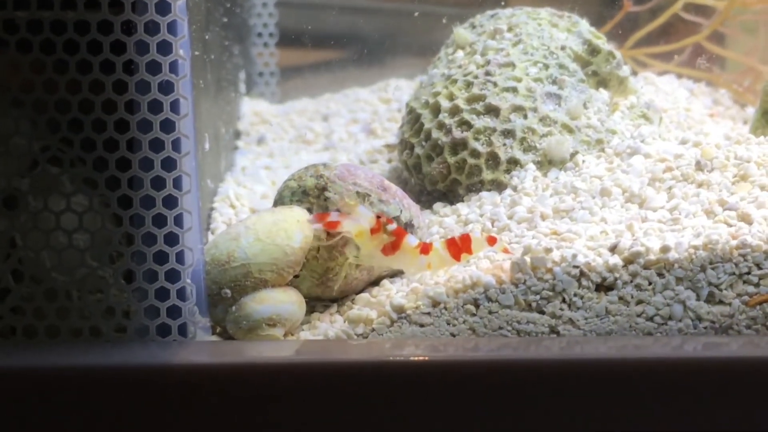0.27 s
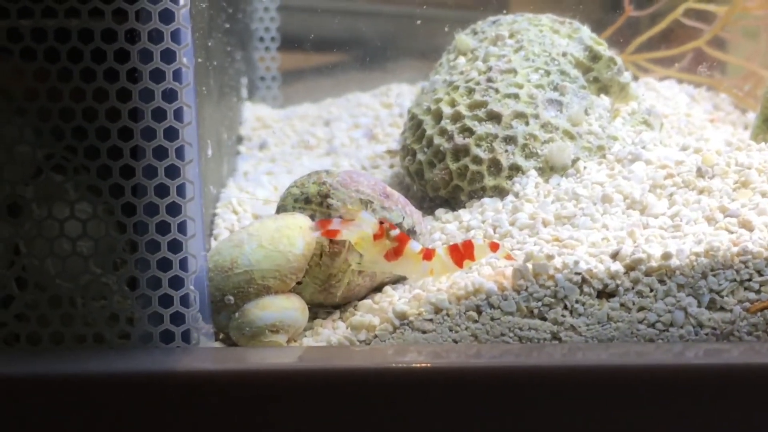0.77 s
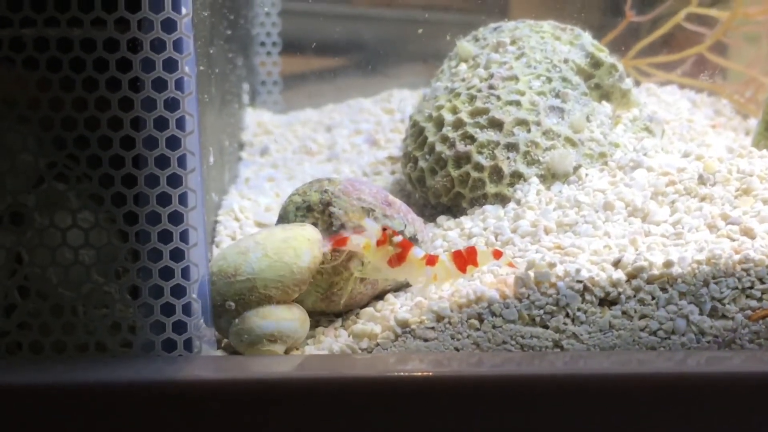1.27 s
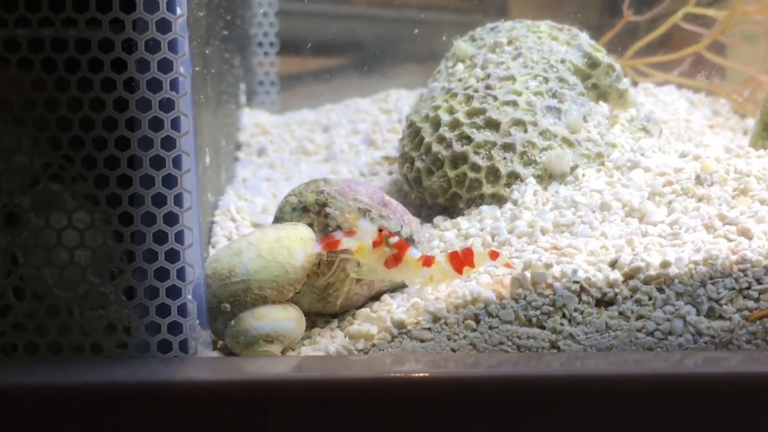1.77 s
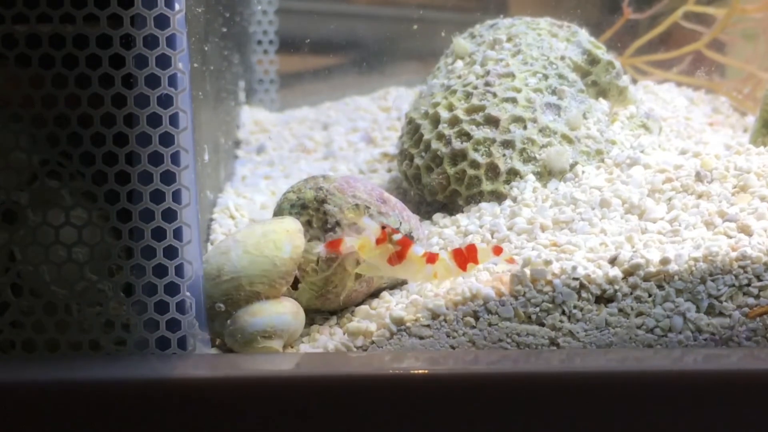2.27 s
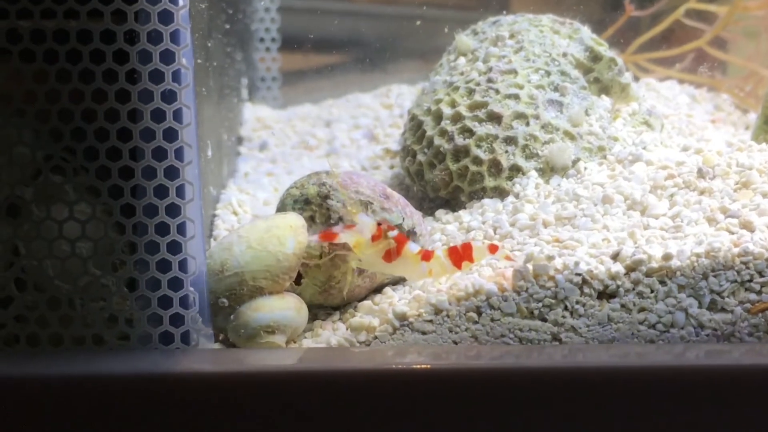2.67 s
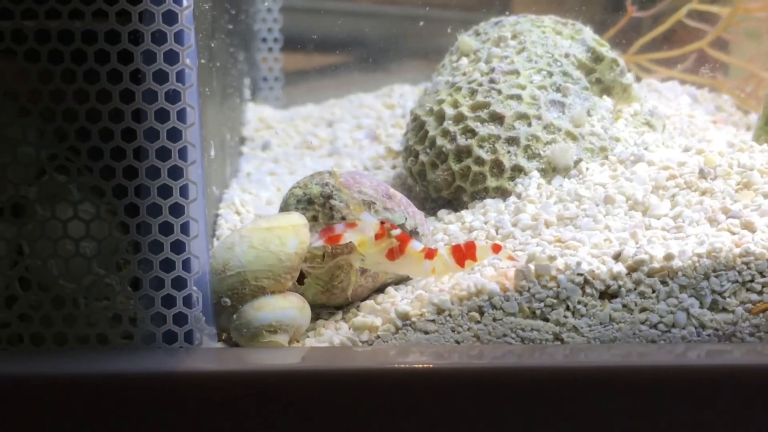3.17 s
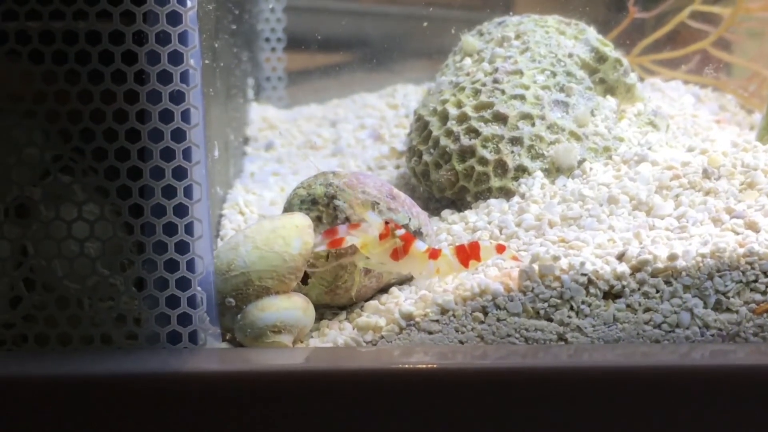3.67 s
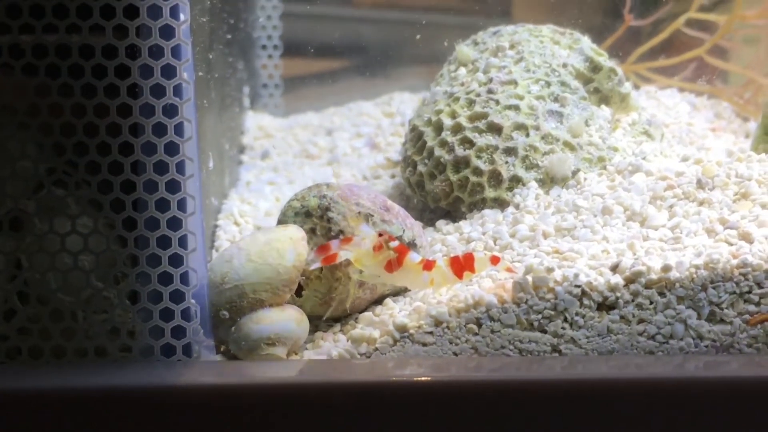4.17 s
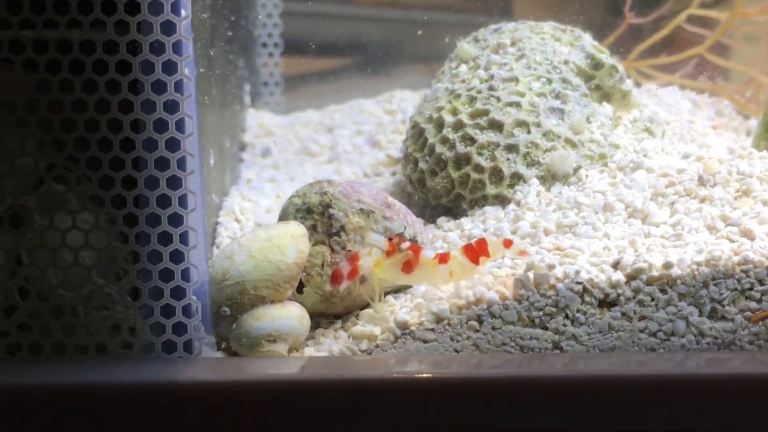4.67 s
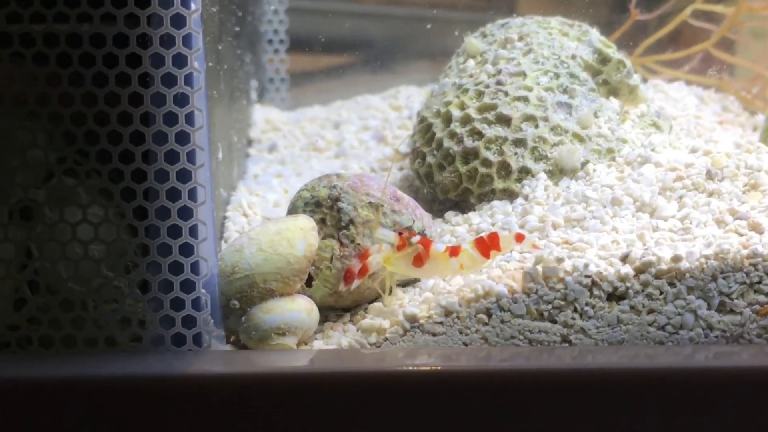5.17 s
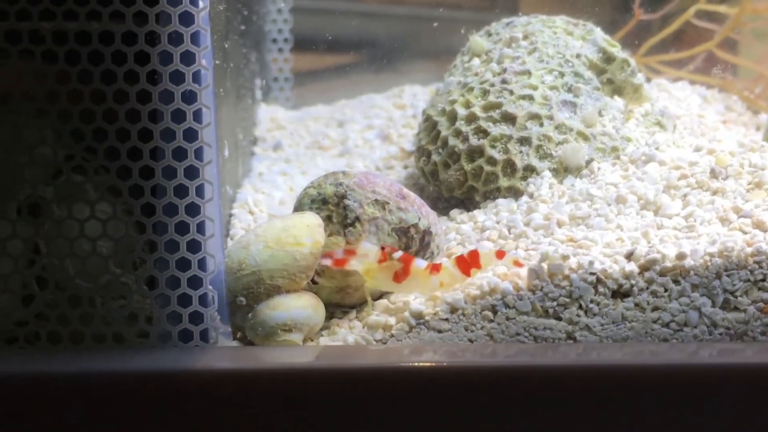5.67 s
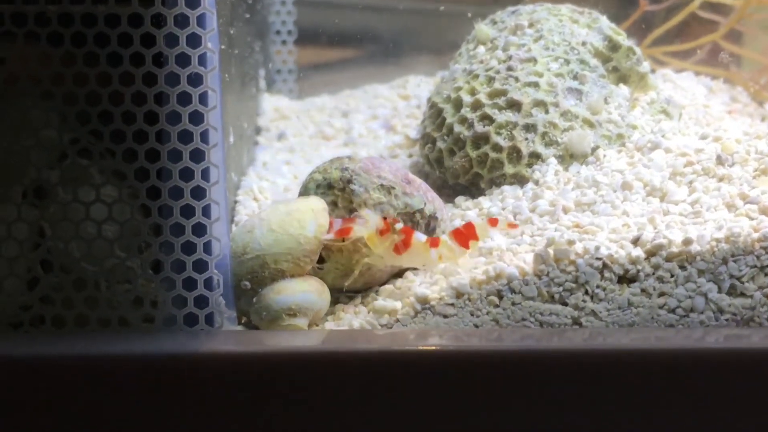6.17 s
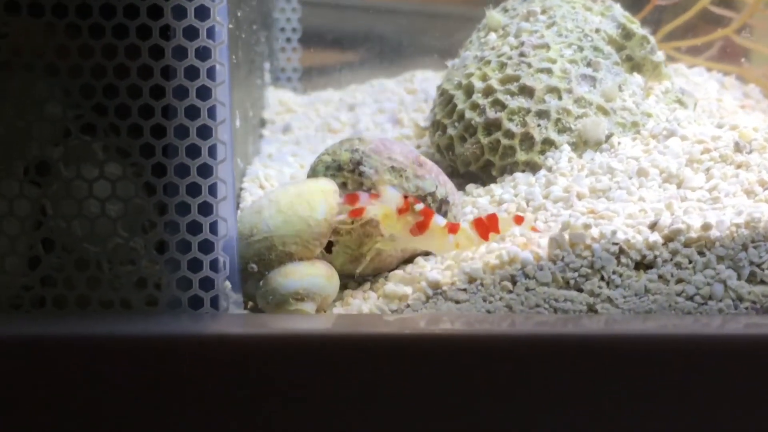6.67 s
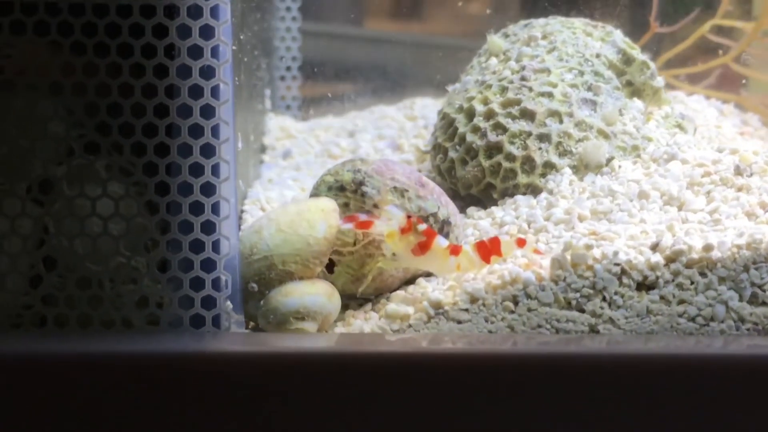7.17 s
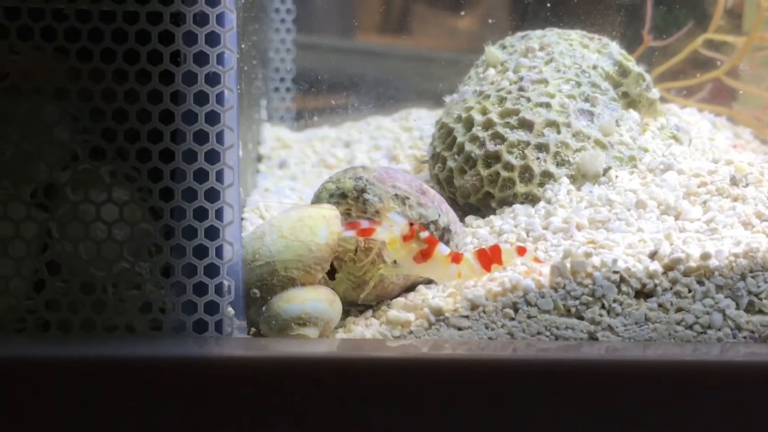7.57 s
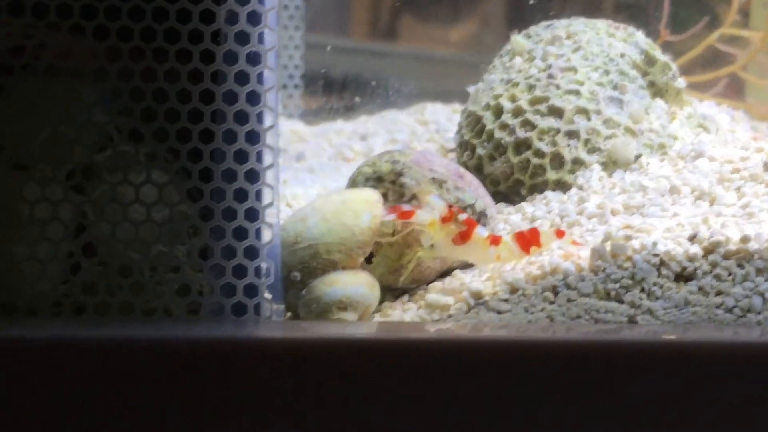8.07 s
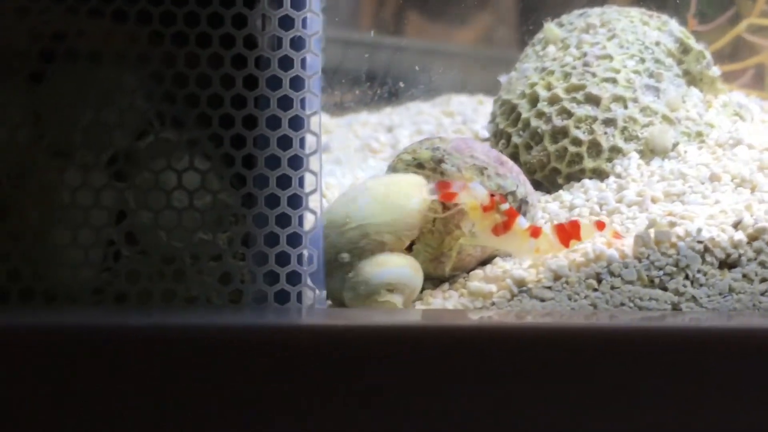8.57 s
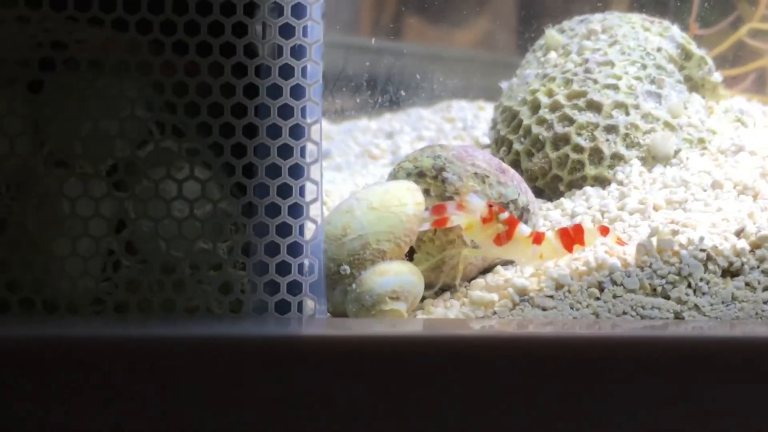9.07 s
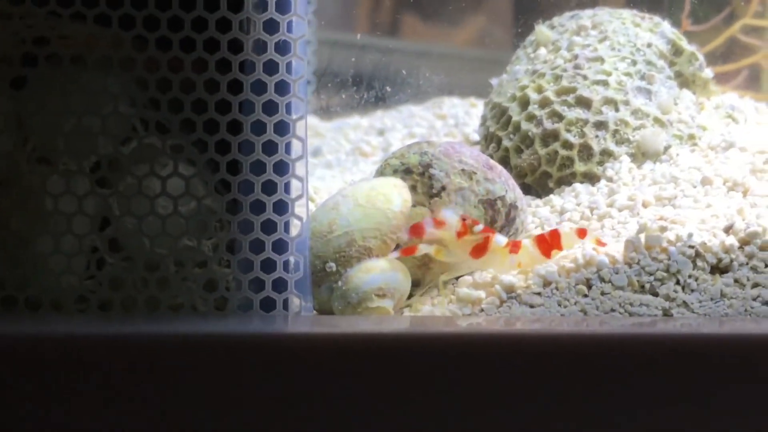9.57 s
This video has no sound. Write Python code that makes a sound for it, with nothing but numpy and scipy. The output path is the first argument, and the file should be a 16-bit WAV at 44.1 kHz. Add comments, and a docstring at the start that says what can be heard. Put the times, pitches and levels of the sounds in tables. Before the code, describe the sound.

Three sharp, irregularly spaced claw snaps from a shrimp in a home aquarium, with pump equipment humming low throughout.

```python
"""A pistol shrimp snaps its claw three times in a home aquarium.
Each snap is a collapsing bubble: one sharp pulse that rattles between the panes, rings the glass
and dies away in the room. Behind it the pump hums, its impeller whirrs, the water washes around
and four faint ticks sound. A noise suppressor holds the hiss down, but lets it through for a
moment after each snap."""
import sys
import numpy as np
from scipy import signal
from scipy.fft import rfft, irfft
from scipy.io import wavfile
from scipy.ndimage import uniform_filter1d, minimum_filter1d

SR = 44100
rng = np.random.default_rng(int(sys.argv[2]) if len(sys.argv) > 2 else 0)


def to_wav(sig):
    """Store sig (one row per channel, or 1-D mono) as 16-bit WAV at the path in sys.argv[1].

    Samples outside -1..1 are clipped; the rate is SR.
    """
    pcm = np.clip(np.atleast_2d(sig), -1, 1) * 32767
    pcm = np.round(pcm).astype(np.int16)
    wavfile.write(sys.argv[1], SR, pcm.T)  # frames by channels


N = 432178  # 9.8 seconds


def amp(db):
    """Turns decibels into a number to multiply by."""
    return 10 ** (np.asarray(db) / 20)


def unit_level(x):
    """Scales a sound so that its average level (rms) is 1."""
    return x / np.sqrt(np.mean(x ** 2) + 1e-20)


def curve(points, hz):
    """Joins the (frequency, value) rows of a table and looks up the value at hz."""
    point_hz, value = np.transpose(points)
    return np.interp(np.log(hz + 1), np.log(point_hz + 1), value)


def add(mix, start_s, sound):
    """Lays a sound into the mix at its start time."""
    part = mix[round(start_s * SR):][:len(sound)]
    part += sound[:len(part)]


def frequencies(x):
    """Lists the frequencies that make up x, in Hz."""
    return np.fft.rfftfreq(len(x), 1 / SR)


def equalize(x, db):
    """Turns each frequency up or down, without delay."""
    return irfft(rfft(x) * amp(db), len(x))


def equalize_hit(x, db):
    """Turns each frequency up or down so that nothing sounds ahead of a hit (minimum phase)."""
    cepstrum = irfft(np.log(amp(db)), len(x))
    cepstrum[1:len(x) // 2] *= 2
    cepstrum[len(x) // 2 + 1:] = 0
    return irfft(rfft(x) * np.exp(rfft(cepstrum)), len(x))


def hump(hz, centre_hz, octaves):
    """A smooth hump of height 1 around one frequency."""
    return np.exp(-.5 * (np.log2((hz + 1) / centre_hz) / octaves) ** 2)


def noise_band(length, centre_hz, octaves):
    """Noise around one frequency, at level 1."""
    noise = rng.standard_normal(length)
    return unit_level(irfft(rfft(noise) * hump(frequencies(noise), centre_hz, octaves), length))


def drift(rate_hz):
    """Slow random wandering, at level 1."""
    noise = rng.standard_normal(N)
    return unit_level(irfft(rfft(noise) * np.exp(-(frequencies(noise) / rate_hz) ** 2), N))


def low_pass(x, edge_hz):
    """Cuts away everything above edge_hz."""
    return signal.oaconvolve(x, signal.firwin(255, edge_hz, window=("kaiser", 9), fs=SR), "same")


# The rumble of the running equipment. Each row: frequency in Hz, level in dB per Hz.
EQUIPMENT_RUMBLE = [(15, -87), (24, -80), (35, -73), (46, -65.5), (63, -58), (82, -67), (120, -73.5),
                    (180, -74), (240, -77.5), (290, -81.5), (420, -88), (600, -91), (1200, -93),
                    (1550, -97.5)]
# The hiss of water and microphone. Each row: frequency in Hz, level in dB per Hz.
WATER_HISS = [(1950, -94), (2400, -93), (2700, -99), (3300, -99), (4000, -100.5), (5000, -102), (6200, -99),
              (7700, -99), (9000, -96.5), (10000, -99), (10400, -103.5), (11200, -99.5), (15700, -105)]
# Where the cabinet and filter housing ring. Each row: frequency in Hz, width in Hz, boost in dB.
HOUSING_RESONANCES = [(199.5, 4.6, 6), (211.3, 12, 8.5), (351.2, 12, 4.5), (761.5, 25, 6), (802, 17, 5.5),
                      (2229, 28.7, 4.5), (2860, 59.8, 7.5), (3200, 60, 5), (6203, 58, 5.5), (7130, 40, 6.5)]

def wash(swell_db=.5, swell_hz=5):
    """Moving water and vibration make gently swelling noise, louder where the housing rings."""
    noise = rng.standard_normal(N) * np.sqrt(SR / 2)  # 0 dB per Hz
    hz = frequencies(noise)
    boost_db = sum(db / (1 + (2 * (hz - centre) / width) ** 2)
                   for centre, width, db in HOUSING_RESONANCES)
    noise = equalize(noise, curve(EQUIPMENT_RUMBLE + WATER_HISS, hz) + boost_db)
    noise = low_pass(noise, edge_hz=15800)
    water = low_pass(noise, edge_hz=3400)
    steady_hiss = noise - water
    return steady_hiss + water * amp(swell_db * drift(swell_hz))


MAINS_HZ = 60
# The tones of the pump's hum. Each row: multiple of the mains frequency, level in dB, waver in dB.
HUM_TONES = [(1, -42, 1.2), (2, -40, 0.6), (3, -49.5, 1.13), (5, -68.5, 1.9), (6, -76, 1.8), (7, -78, 1.8),
             (8, -70.5, 1.7), (12, -75.5, 2.1), (15, -80, 1.8), (27, -79, 2)]

def pump_hum():
    """The motor shakes the tank at multiples of the mains frequency; each tone wavers a little."""
    mains_phase = 2 * np.pi * MAINS_HZ * np.arange(N) / SR
    hum = np.zeros(N)
    for multiple, db, waver_db in HUM_TONES:
        height = np.sqrt(2) * amp(db + waver_db * drift(rate_hz=3.2))
        hum -= height * np.sin(multiple * mains_phase + .093 * drift(rate_hz=1.5))
    return hum


def impeller_whirr(start_db=-69.5, rise_db_per_s=.2, surge_db=1.1, throb_depth=.28):
    """The pump's paddle wheel throbs with the motor, surges unevenly and slowly gets a bit louder."""
    t = np.arange(N) / SR
    whirr = noise_band(N, centre_hz=1060, octaves=.031)
    surge = amp(surge_db * drift(rate_hz=5))
    throb = 1 + throb_depth * np.cos(2 * np.pi * MAINS_HZ * t)
    return amp(start_db + rise_db_per_s * t) * unit_level(whirr * surge * throb)


# The faint ticks. Each row: start in seconds, level in dB, centre in Hz, width in octaves,
# level of the ring against the puff in dB, seconds to fade by 60 dB.
FAINT_TICKS = [(.745, -59, 6300, .5, -12, .4), (3.919, -55.5, 3760, .23, -1, .3),
               (7.848, -52, 6700, .67, -9, .6), (8.886, -54, 6100, 0.64, -1, .4)]

def tick(db, centre_hz, octaves, ring_db, fade_s, attack_s=.0014):
    """A faint tick, smeared by the room into a puff, with a thin ring above it."""
    t = np.arange(SR // 2) / SR
    puff = noise_band(len(t), centre_hz, octaves)
    ring = amp(ring_db) * noise_band(len(t), 1.5 * centre_hz, octaves=.09)
    return amp(db - 60 * t / fade_s) * np.minimum(t / attack_s, 1) * (puff + ring)


# How long the room echoes. Each row: frequency in Hz, seconds to fade by 60 dB.
ROOM_FADE = [(1000, .5), (6000, .44), (10000, .36), (15000, .31)]
# How loud the room echoes. Each row: frequency in Hz, level against the snap in dB.
ROOM_LEVELS = [(1000, -27.5), (3000, -20), (4400, -16.5), (6200, -21.5), (8200, -24.5), (9700, -29),
               (10800, -25.5), (13000, -29), (15300, -29)]

def room_echo(x, far_wall_s=.066, far_wall_db=5.5, far_wall_width_s=.02, attack_s=.003):
    """The room adds a blurred tail that swells as the far wall answers; its treble dies first."""
    hz, t, noise_spectra = signal.stft(rng.standard_normal(SR // 2), SR)
    swell_db = far_wall_db * np.exp(-((t - far_wall_s) / far_wall_width_s) ** 2)
    fade_db = -60 * t / curve(ROOM_FADE, hz)[:, None]
    _, tail = signal.istft(noise_spectra * amp(swell_db + fade_db), SR)
    tail *= np.minimum(np.arange(len(tail)) / SR / attack_s, 1)
    tail = equalize_hit(tail / np.linalg.norm(tail), curve(ROOM_LEVELS, frequencies(tail)))
    return signal.oaconvolve(x, tail)[:N]


# How well the panes let the echoes out (low ones poorly). Each row: frequency in Hz, gain in dB.
PANE_GAINS = [(1000, -13), (3200, 2.5), (4200, 2.5), (5200, 0.5), (9500, -4.5), (11500, -6.5),
              (15500, -4.5)]
# The ringing of the full glass tank. Each row: frequency in Hz, level in dB, seconds to fade by 60 dB.
GLASS_TONES = [(3850, -41, .035), (4300, -36, .026), (5660, -41, .026), (6160, -35, .023),
               (6980, -42, .025), (7280, -39, .016), (8250, -38, .017), (8930, -35, .014),
               (9820, -35, .012), (11150, -43, .02), (13600, -41, .014)]
# The tone colour of the crack as it leaves the tank. Each row: frequency in Hz, gain in dB.
CRACK_COLOUR = [(200, -40), (1000, -27), (2500, -22.5), (3700, -21.5), (4400, -13), (6000, -5.5),
                (8000, 2.5), (9700, 6), (10500, -1.5), (12000, 3.5), (14200, 0.5), (15400, -8),
                (16500, -33)]
# The shrimp's snaps. Each row: start in seconds, strength in dB, extra body in dB, extra treble in dB,
# level of the echoes in the tank in dB, seconds for most of them to fade by 60 dB.
CLAW_SNAPS = [(1.0079, 6.5, 1, 2, 1.5, 0.014), (2.288, 4.5, 0, 4.5, 0, 0.015),
              (7.9181, 10, 4, -0.5, 0, 0.019)]

def claw_snap(db, body_db, treble_db, echoes_db, fade_s, glass_db=3, linger_db=-25, linger_s=.077):
    """A bubble collapses in one pulse, which bounces between the panes and sets the glass ringing."""
    t = np.arange(2 ** 12) / SR
    hz = frequencies(t)
    fade = amp(-60 * t / fade_s) + amp(linger_db - 60 * t / linger_s)  # a few echoes linger
    echoes = rng.choice([-1, 1], len(t)) * fade * (t > .0003)
    crack = amp(echoes_db) * equalize_hit(echoes / np.linalg.norm(echoes), curve(PANE_GAINS, hz))
    crack[0] += 1  # the pulse itself
    for tone_hz, tone_db, ring_s in GLASS_TONES:
        crack += amp(glass_db + tone_db - 60 * t / ring_s) * np.cos(2 * np.pi * tone_hz * t)
    # a bigger bubble has more body and less treble
    bubble_db = body_db * hump(hz, 4100, octaves=.51) + treble_db * hump(hz, 15500, octaves=.2)
    return amp(db) * equalize_hit(crack, curve(CRACK_COLOUR, hz) + bubble_db)


def scene():
    """Mixes the snaps and their room echo with the ticks, pump and water, in one channel."""
    snaps, ticks = np.zeros(N), np.zeros(N)
    for start_s, *settings in CLAW_SNAPS:
        add(snaps, start_s, claw_snap(*settings))
    for start_s, *settings in FAINT_TICKS:
        add(ticks, start_s, tick(*settings))
    return (snaps + room_echo(snaps) + ticks + pump_hum() + impeller_whirr() + wash())[None]


# How the noise suppressor turns the sound down while shut. Each row: frequency in Hz, gain in dB.
SUPPRESSOR_GAINS = [(150, -1), (350, -1.5), (1500, -1.5), (2900, -2.5), (3600, -7.5), (6500, -9),
                    (9000, -10.5), (15000, -9)]

def record(dry, open_above=.15, hold_s=.403, ceiling=.96):
    """A loud peak briefly opens the noise suppressor; a limiter tames peaks; the top treble is cut."""
    x, t = dry[0], np.arange(N) / SR
    last_loud_s = np.maximum.accumulate(np.where(abs(x) > open_above, t, -np.inf))
    is_open = t - last_loud_s < hold_s
    openness = uniform_filter1d(is_open.astype(float), size=128)
    suppressed = equalize(x, curve(SUPPRESSOR_GAINS, frequencies(x)))
    x = openness * x + (1 - openness) * suppressed
    allowed_gain = ceiling / np.maximum(abs(x), ceiling)
    limiter_gain = uniform_filter1d(minimum_filter1d(allowed_gain, size=11), size=11)
    return low_pass(x * limiter_gain, edge_hz=16700)[None]


dry = scene()
out = record(dry)
to_wav(out)
```